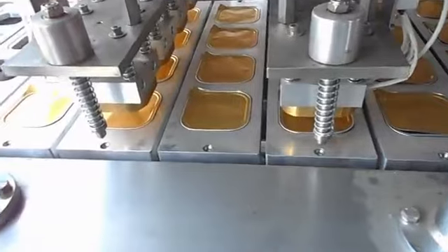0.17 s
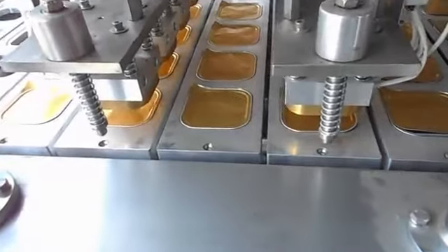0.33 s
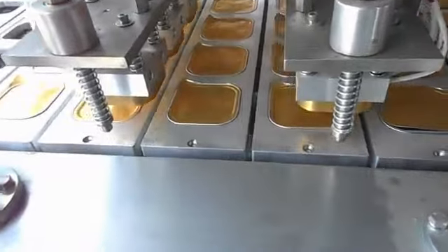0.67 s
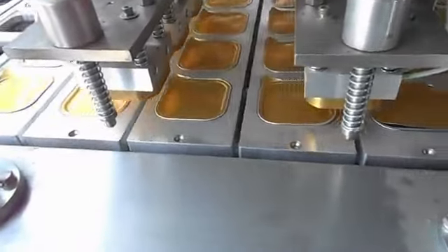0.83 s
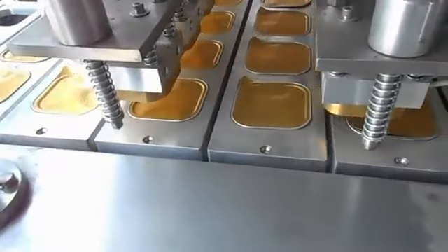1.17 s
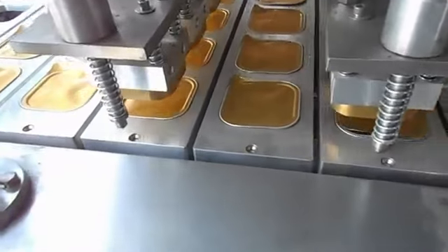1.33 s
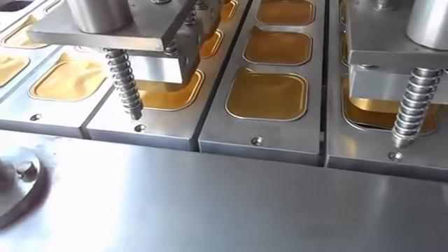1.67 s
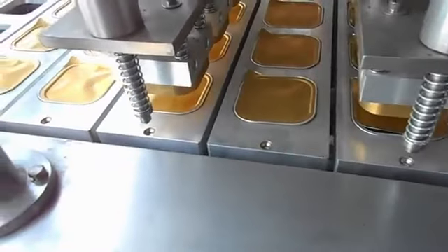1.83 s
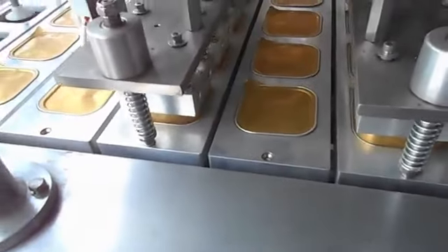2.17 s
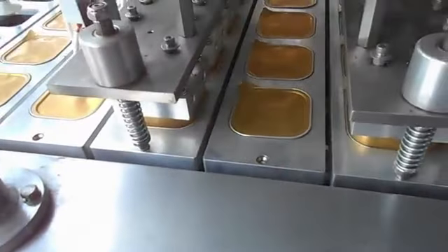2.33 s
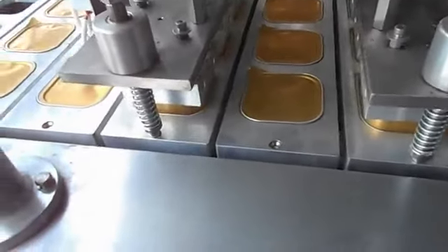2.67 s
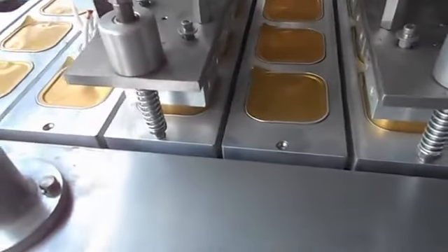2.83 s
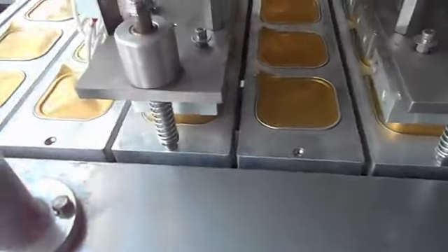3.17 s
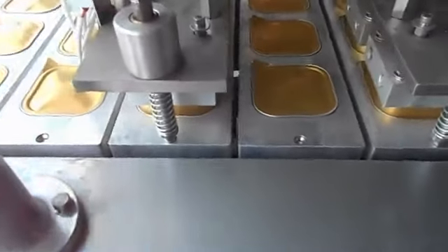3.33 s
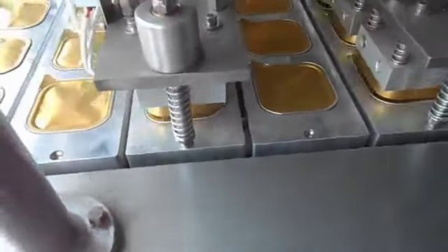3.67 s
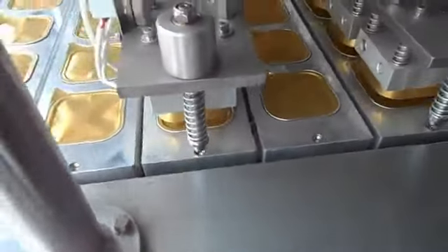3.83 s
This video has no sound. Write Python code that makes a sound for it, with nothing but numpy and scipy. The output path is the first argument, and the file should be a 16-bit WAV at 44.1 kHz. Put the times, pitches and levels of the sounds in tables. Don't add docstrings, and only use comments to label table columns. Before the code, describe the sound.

Compressed air from a tray sealer, close microphone, left channel only: rising hiss, metallic snap, then a double click, heavy clunk and hard air release, followed by long hissing, small knocks and a late sharp spurt.

```python
import sys
import numpy as np
from scipy import signal
from scipy.fft import rfft, irfft
from scipy.io import wavfile
from scipy.ndimage import uniform_filter1d, map_coordinates

SR = 44100
rng = np.random.default_rng(int(sys.argv[2]) if len(sys.argv) > 2 else 0)


def transcribe(signal):
    frames = np.atleast_2d(signal).T
    limited = np.clip(frames, -1, 1)
    pcm = np.round(limited * 32767).astype(np.int16)
    wavfile.write(sys.argv[1], SR, pcm)


def voltage_ratio(decibels):
    exponent = np.asarray(decibels, float) / 20
    return 10 ** exponent


N = 176400


def unit(x):
    return x / np.sqrt(np.mean(x ** 2) + 1e-20)


def along(points, hz):
    f, level = np.transpose(points)
    return np.interp(np.log(hz + 1), np.log(f + 1), level)


def curve(rows):
    return np.interp(np.arange(N) / SR, *np.transpose(rows))


def wobble(rate_hz):
    knots = rng.standard_normal(int(N * rate_hz / SR) + 4)
    return map_coordinates(knots, [np.arange(N) * rate_hz / SR])


def since(start_s):
    return np.maximum(np.arange(N) / SR - start_s, 0)


def add(track, start_s, sound):
    track[round(start_s * SR):][:len(sound)] += sound


def air(spectrum, ports=(), patchy_db=-1.5, streak_db=-1.0):
    hz, _, z = signal.stft(rng.standard_normal(N), SR, nperseg=2048)

    def blur(bins, frames):
        across = uniform_filter1d(rng.standard_normal(z.shape), bins, 0)
        return unit(uniform_filter1d(across, frames, 1))

    lift = sum(db * np.exp(-((hz - centre) / width) ** 2 * 2) for centre, width, db in ports)
    field = patchy_db * blur(24, 3) + streak_db * blur(2, 70)
    colour = along(spectrum, hz) + lift
    noise = signal.istft(z * voltage_ratio(field + colour[:, None]), SR, nperseg=2048)[1]
    return unit(noise[:N])


def ring(modes, t):
    out = 0
    for hz, db, t60 in modes:
        decay = voltage_ratio(db + rng.normal(0, 2) - 60 * t / abs(t60))
        out = out + decay * np.sin(2 * np.pi * hz * t)
    return out


SHAFT_HZ = 24.6


def orders(rows, wander_db, drift_rad):
    turn = 2 * np.pi * SHAFT_HZ * np.arange(N) / SR
    out = 0
    for multiple, db in rows:
        level = 2 ** .5 * voltage_ratio(db + wander_db * wobble(5.144))
        out = out + level * np.sin(round(multiple) * turn + drift_rad * wobble(14))
    return out


# [f/Hz, level/dB per Hz]
HALL_RUMBLE = [(20, -9), (60, -16.5), (110, -11), (200, -14), (300, -18), (500, -29.5), (1500, -28),
               (3000, -41)]
# [shaft multiple, level/dB]
HUM_ORDERS = [(4, -60), (5, -56), (6, -58), (7, -47.5), (11, -57.5)]
# [t/s, level/dB]
DRIVE_LEVEL = [(0.0, -43), (0.17, -35.5), (0.32, -34.5), (0.67, -32.5), (0.92, -32), (1.39, -33.5),
               (1.85, -33.5), (2.0, -40), (2.1, -42), (2.21, -46.5), (3.0, -54), (3.58, -47), (3.73, -56),
               (4.0, -53)]
# [f/Hz, level/dB per Hz]
DRIVE_NOISE = [(150, -7.5), (300, -3.5), (700, -2.5), (1200, -5.5), (2200, -13.5), (4000, -17.5),
               (10000, -22), (12300, -92)]
# [shaft multiple, level/dB over its noise]
DRIVE_ORDERS = [(9, -12.5), (11, -10.5), (19, -18), (24, -11.5), (26, -26.5), (32, -16.5), (34, -14)]


def hall():
    whirr = air(DRIVE_NOISE, patchy_db=1.5, streak_db=1.0)
    drive = whirr + orders(DRIVE_ORDERS, wander_db=2.5, drift_rad=1.24)
    rumble = voltage_ratio(-44) * air(HALL_RUMBLE, patchy_db=1.5, streak_db=4.5)
    hum = orders(HUM_ORDERS, wander_db=1.1, drift_rad=1.35)
    return voltage_ratio(curve(DRIVE_LEVEL) - 0.5) * drive + rumble + hum


def room(x):
    level_db, t60_s, gap_s = -21, 0.17, .008
    t = np.arange(SR // 2) / SR
    tail = rng.standard_normal(len(t)) * voltage_ratio(-60 * t / t60_s) * (t > gap_s)
    return voltage_ratio(level_db) * signal.fftconvolve(x, tail / np.linalg.norm(tail))[:N]


# [t/s, level/dB, t60/s, centre f/Hz, thud level/dB]
CLUNKS = [(.95, -26.5, 0.19, 905, -50), (1.799, -28, 0.13, 800, -43), (1.828, -26, .12, 900, -41),
          (1.921, -17.5, 0.12, 900, -28), (1.965, -32, 0.45, 465, -29), (2.214, -31.5, 0.13, 600, -38),
          (2.394, -34, 0.098, 1560, -58), (2.15, -35, 0.077, 2900, -44), (2.435, -32.5, 0.26, 1120, -52),
          (2.707, -37, 0.25, 430, -43), (3.511, -34, 0.39, 497, -37), (3.523, -35.5, 0.27, 1640, -42),
          (3.566, -33, 0.32, 930, -50), (3.641, -36.5, .12, 920, -36)]
# [f/Hz, level/dB, t60/s]
FRAME = [(111.3, -1, 0.51), (222, 5.5, 0.055)]
# [f/Hz, level/dB, t60/s]
PLATE = [(528, -3.5, 0.26), (730, 1, 0.14), (933, -1.5, 0.11), (1097, -3, 0.23), (1640, 4.5, 0.23),
         (2390, 6, 0.21), (2530, 7, 0.16)]


def clunks():
    plate_db, rise_s = -7, 0.0016
    wide = 2 ** 0.96
    out, t = np.zeros(N + SR), np.arange(SR // 3) / SR
    for s, db, t60, hz, thud_db in CLUNKS:
        band = signal.butter(2, [hz / wide, hz * wide], "band", fs=SR, output="sos")
        blow = unit(signal.sosfilt(band, rng.standard_normal(len(t)))) * voltage_ratio(-60 * t / t60)
        near = [(f, level - 9 * abs(np.log2(f / hz)), life) for f, level, life in PLATE]
        plate = voltage_ratio(plate_db) * ring(near, t)
        thud = voltage_ratio(thud_db) * ring(FRAME, t)
        add(out, s, (1 - np.exp(-t / rise_s)) * (voltage_ratio(db) * (blow + plate) + thud))
    return out[:N]


# [t/s, level/dB, t60/s, which valve]
SNAPS = [
    (1.1029, -9.5, 0.082, 1),
    (1.7508, -17, 0.15, 0),
    (1.759, -17, 0.075, 0),
]
# [f/Hz, level/dB, t60/s]
VALVES = [
    [(1068, 6, 0.026), (2750, -13, .05), (3110, 1.5, 0.027), (4900, -14, 0.035), (6300, -6, .04),
     (8300, -14, 0.037)],
    [(737, -16, 0.18), (1010, -7, 0.037), (1496, -11, 0.055), (2130, -6, 0.043), (2504, 4.5, 0.028),
     (5500, -3, 0.035), (9700, -0.5, 0.042)],
]
# [f/Hz, level/dB per Hz]
SNAP_AIR = [(300, -45), (800, -3), (2500, -2.5), (4000, -3), (8000, -0.5), (10300, -11), (11500, -34),
            (16000, -40)]


def valves():
    rise_s = 0.0023
    out, t = np.zeros(N + SR), np.arange(SR // 4) / SR
    rattle = air(SNAP_AIR)[-SR // 4:]
    for s, db, t60, which in SNAPS:
        burst = rattle * voltage_ratio(-60 * t / t60)
        body = 1.08 * ring(VALVES[round(which)], t)
        add(out, s, voltage_ratio(db) * (1 - np.exp(-t / rise_s)) * (burst + body))
    return out[:N]


# [t/s, level/dB, length/s]
PUFFS = [
    (.934, -30, .03),
    (3.516, -16, .017),
    (3.545, -26, .04),
    (1.648, -47, .02),
    (1.708, -44, .02),
]
# [f/Hz, level/dB per Hz]
PUFF_AIR = [(3000, -50), (6500, -11), (8000, -1.5), (9800, -8), (11000, -28), (12400, -40)]


def puffs():
    rise_s, release_t60_s = 0.0039, .035
    shape, t = np.zeros(N + SR), np.arange(SR // 4) / SR
    for s, db, hold in PUFFS:
        release = voltage_ratio(db - 60 * np.maximum(t - hold, 0) / release_t60_s)
        add(shape, s, release * np.clip(t / rise_s, 0, 1))
    return shape[:N] * voltage_ratio(0.73 * wobble(150)) * air(PUFF_AIR)


BLOW_OPENS_S = 1.79
# [t/s, level/dB]
FILL = [(0, -47), (.17, -39), (.4, -32), (.81, -27.5), (.95, -25.5), (1.1, -31.5), (1.2, -36), (1.4, -46),
        (1.79, -87)]
# [f/Hz, level/dB per Hz]
FILL_AIR = [(700, -17), (1300, -3), (3600, -6.5), (5500, -4.5), (7300, -6.5), (9500, -3), (10600, -11),
            (12300, -34)]
# [f/Hz, width/Hz, lift/dB]
FILL_PORTS = [(6170, 520, 4.5), (8320, 840, 6.5)]


def cylinder():
    on = np.arange(N) / SR < BLOW_OPENS_S + .05
    flow = voltage_ratio(curve(FILL) + 0.94 * wobble(12.87))
    return on * flow * air(FILL_AIR, FILL_PORTS, patchy_db=1.17, streak_db=2.5)


# [t/s, level/dB]
BLAST = [(1.79, -26), (1.796, -17.5), (1.826, -17), (1.838, -13), (1.925, -14.5), (1.95, -18), (2.0, -22)]
# [f/Hz, level/dB per Hz]
BLAST_AIR = [(500, -24), (1200, -19.5), (3000, -15), (5000, -8.5), (6500, -9.5), (7500, -2.5),
             (10300, -3.5), (11200, -18), (12300, -28)]
# [t/s, level/dB]
BLOW = [(1.97, -26), (2.01, -28), (2.29, -28), (2.65, -28.5), (2.69, -26), (2.88, -28), (3.44, -28.5),
        (3.47, -28), (3.89, -32.5), (4.0, -31.5)]
# [f/Hz, level/dB per Hz]
BLOW_AIR = [(1000, -41.5), (2000, -25), (4000, -11), (6000, -9.5), (7600, -3.5), (10000, -2.5),
            (10900, -17.5), (12300, -29)]
# [f/Hz, width/Hz, lift/dB]
BLOW_PORTS = [(2240, 58, 4.5), (4310, 150, 6), (4785, 140, 6.5), (5303, 70, 4), (7470, 330, 2),
              (8330, 280, 4), (8500, 150, -5.5), (11800, 320, 3)]


def exhaust():
    rise_s, settles_s, settling_s = 0.0026, 1.93, 0.066
    opening = 1 - np.exp(-since(BLOW_OPENS_S) / rise_s)
    settled = np.clip(since(settles_s) / settling_s, 0, 1)
    rush = voltage_ratio(curve(BLAST)) * air(BLAST_AIR, patchy_db=0.7, streak_db=2.0)
    steady = voltage_ratio(curve(BLOW) + 8.0) * air(BLOW_AIR, BLOW_PORTS, patchy_db=0.25, streak_db=5.0)
    flutter = voltage_ratio(0.58 * wobble(14) + 0.41 * wobble(60))
    return opening * (np.sqrt(1 - settled) * rush + np.sqrt(settled) * flutter * steady)


def scene():
    blows = clunks() + valves()
    left = hall() + room(blows) + blows + puffs() + cylinder() + exhaust()
    return np.array([voltage_ratio(6) * left, np.zeros(N)])


def band_limit(x):
    return signal.sosfilt(signal.butter(12, 16160, fs=SR, output="sos"), x)


def record(dry):
    mic_top_hz, ceiling, knee = 12400, 0.93, 11
    heard = np.fft.rfftfreq(N, 1 / SR) < mic_top_hz
    x = irfft(rfft(dry) * heard, N)
    limited = x / (1 + np.abs(x / ceiling) ** knee) ** (1 / knee)
    return band_limit(limited)


dry = scene()
out = record(dry)
transcribe(out)
```